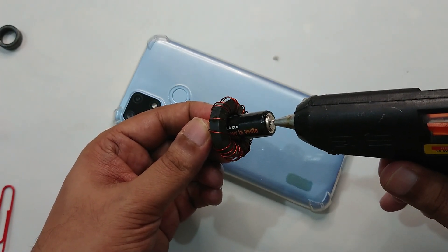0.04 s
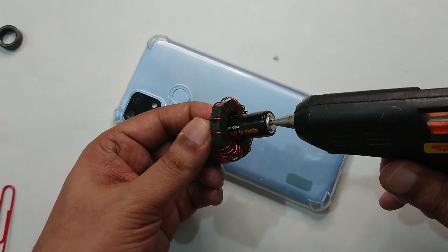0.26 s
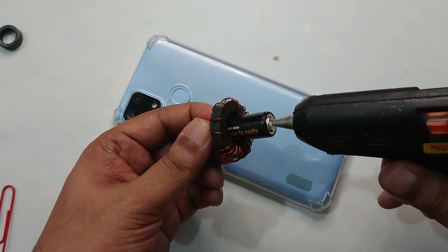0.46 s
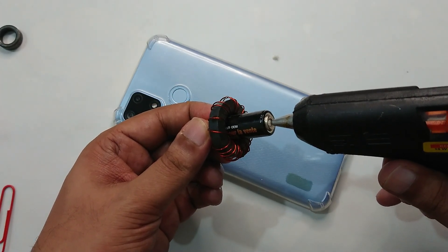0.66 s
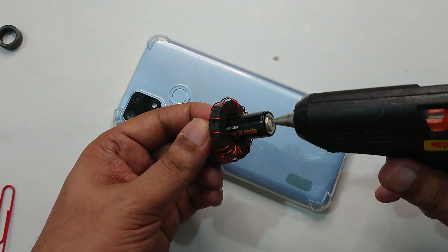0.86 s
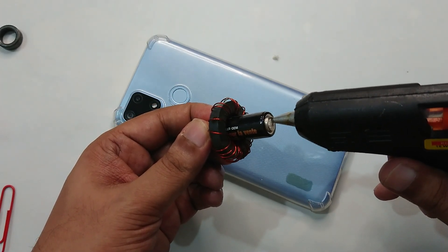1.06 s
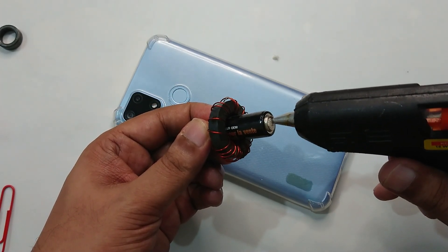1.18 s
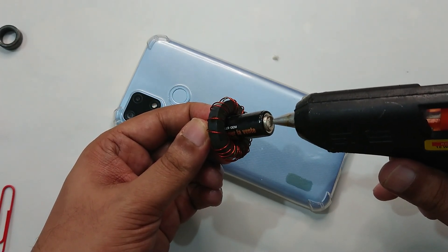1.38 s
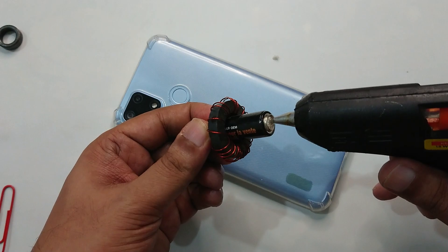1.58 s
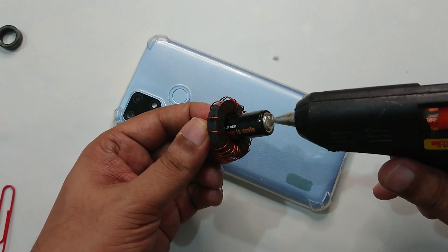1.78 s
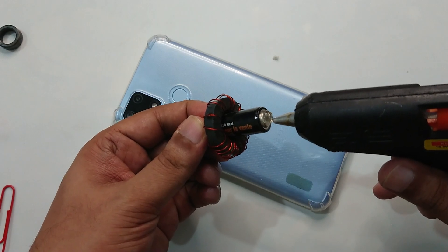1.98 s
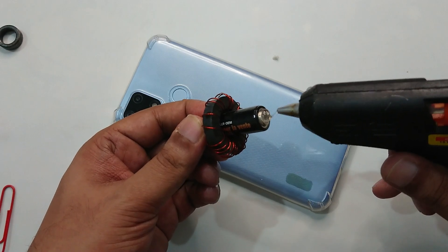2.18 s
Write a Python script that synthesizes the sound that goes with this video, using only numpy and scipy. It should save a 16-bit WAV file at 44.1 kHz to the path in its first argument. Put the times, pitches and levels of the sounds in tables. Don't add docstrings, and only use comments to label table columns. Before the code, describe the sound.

A hot glue gun's plastic trigger cracks once, very sharp and close, with a bright room tail; half a second later the released trigger knocks and ticks with a tiny spring ping, over faint rumble and hiss.

```python
import sys
import numpy as np
from scipy import signal
from scipy.fft import irfft
from scipy.io import wavfile
from scipy.ndimage import uniform_filter1d

SR = 44100
rng = np.random.default_rng(int(sys.argv[2]) if len(sys.argv) > 2 else 0)


def dump(signal):
    limited = np.clip(np.atleast_2d(signal).T, -1, 1)
    pcm = np.round(limited * 32767).astype(np.int16)
    wavfile.write(sys.argv[1], SR, pcm)


def attenuation_scalar(level_db):
    decades = np.asarray(level_db, float) / 20
    return 10 ** decades


N = 98651
SNAP_S = 1.64825

# f/Hz, level/dB, t60/s
PORT_RINGS = [
    [(6930, -12, .006), (9130, -10, 0.0072), (10620, -2.5, .004), (12820, 6, 0.0036), (13500, -16, 0.0088)],
    [(6860, -5, .005), (8650, 2.5, 0.0067), (10150, -1.5, .0035), (12400, -2.5, 0.0044),
     (13500, -11.5, 0.0085)],
]


def evened(x):
    return x / np.sqrt(np.mean(x ** 2) + 1e-30)


def read(points, hz):
    f, value = np.transpose(points)
    return np.interp(np.log(hz + 1), np.log(f + 1), value)


def spikes(times, sizes):
    hz = np.fft.rfftfreq(N, 1 / SR)
    return irfft(np.asarray(sizes) @ np.exp(-2j * np.pi * np.outer(times, hz)), N)


def modes(table, turn=-1):
    rise_s = 0.00008
    t = np.arange(4096) / SR
    ring = np.zeros(4096)
    for k, (hz, db, t60) in enumerate(table):
        ring += turn ** k * attenuation_scalar(db - 60 * t / t60) * np.sin(2 * np.pi * hz * t)
    return ring * (1 - np.exp(-t / rise_s))


def hum(hz, width_hz):
    r = np.exp(-np.pi * width_hz / SR)
    noise = rng.standard_normal(N) + 1j * rng.standard_normal(N)
    slow = signal.lfilter([1 - r], [1, -r], noise)
    carrier = np.exp(2j * np.pi * hz * np.arange(N) / SR)
    return evened((slow * carrier).real)


def wash(colour, patchy_db, level_db):
    # f/Hz, correlation
    likeness = [(60, 0.91), (130, 0.69), (290, 0.99), (640, 0.54), (1410, 0.24), (3100, -0.082),
                (6820, -0.04), (15000, 0.095)]
    # f/Hz, left over right/dB
    balance = [(60, -4), (110, -3.5), (200, -6.5), (380, -3), (700, -5.5), (1290, -5), (2380, -4.5),
               (4400, 4), (8120, -0.5), (15000, -3)]
    frames, hz = N // 256 + 5, np.fft.rfftfreq(1024, 1 / SR)
    a, b, c, d, patches = rng.standard_normal((frames, 513, 5)).T
    patches = uniform_filter1d(patches, size=10, axis=0)
    patches = evened(uniform_filter1d(patches, size=12, axis=1))
    same = np.clip(read(likeness, hz), -1, 1)[:, None]
    left = a + 1j * b
    right = same * left + np.sqrt(1 - same ** 2) * (c + 1j * d)
    colour_db = read(colour, hz) + np.outer([.5, -.5], read(balance, hz))
    z = np.array([left, right]) * attenuation_scalar(colour_db[..., None] + patchy_db * patches)
    x = signal.istft(z, nperseg=1024, noverlap=768)[1][:, :N]
    return attenuation_scalar(level_db) * x / np.std(x.mean(0))


def hiss():
    # f/Hz, level per Hz/dB
    hiss_colour = [(590, -28), (1350, -1.5), (1590, -10), (2990, -13.5), (4100, -13.5), (5740, -28),
                   (11500, -17.5), (15800, -19.5)]
    return wash(hiss_colour, 1.2, -78)


def rumble_swell():
    # t/s, level/dB
    swell = [(0.0, -57), (0.17, -68), (0.53, -66.5), (0.69, -65.5), (1.08, -66), (1.22, -71), (1.3, -69),
             (1.76, -65.5), (2.0, -68.5), (2.23, -70)]
    s, db = np.transpose(swell)
    return np.interp(np.arange(N) / SR, s, db - db.mean())


def rumble():
    # f/Hz, level per Hz/dB
    rumble_colour = [(26, -36.5), (45, -5.5), (96, -3), (175, -9), (300, -13), (474, -14.5), (717, -22.5),
                     (820, -14.5), (1100, -27.5), (1430, -61.5)]
    return wash(rumble_colour, 1.7, -64) * attenuation_scalar(0.16 * rumble_swell())


def fan_drone():
    # f/Hz, width/Hz, level/dB
    drone_tones = [(47.3, 1.3, -68), (89.3, 3.4, -72), (98.45, 2.8, -66.5), (137.4, 7.8, -76.5),
                   (194.3, 16, -78), (303.6, 5.2, -79.5), (770.5, 9.4, -81), (821, 14, -80),
                   (1319, 37, -88)]
    hums = np.array([attenuation_scalar(db) * hum(hz, width) for hz, width, db in drone_tones])
    swelling = hums[1:4].sum(0) * attenuation_scalar(rumble_swell())
    steady = hums[0] + hums[4:].sum(0)
    return (swelling + steady) * attenuation_scalar([[-2.2], [2.1]])


def far_squeal():
    # t/s, level/dB
    squeal_fade = [
        (1.96, -100),
        (2.0, -86.5),
        (2.1, -95),
        (2.14, -100),
    ]
    fade_db = np.interp(np.arange(N) / SR, *np.transpose(squeal_fade))
    return attenuation_scalar(fade_db) * hum(2170, 10)


def room(x):
    # f/Hz, level per Hz/dB
    tail_colour = [(200, -4), (883, -14), (2050, -18), (3500, -21), (5000, -12), (9930, -1), (14900, -6),
                   (15250, -40)]
    # f/Hz, left over right/dB
    tail_balance = [(60, -6.5), (110, -6.5), (200, -1.5), (380, 0), (700, -10), (1290, -2.5), (2380, 0.5),
                    (4400, 5), (8120, -4), (15000, 12)]
    # f/Hz, t60/s
    tail_decay = [(500, 0.28), (1320, 0.46), (3480, 0.43), (6000, .42), (9190, 0.39), (12000, .35),
                  (15000, 0.33)]
    dip_hz, dip_width_hz, dip_db = 5500, 200, -10.5
    first_wall_s, build_s, near_db, fade_in_s = 0.0064, 0.0017, -10.5, 0.0026

    slots = np.arange(60, SR - 6, 6)
    at = slots + rng.integers(0, 6, (2, len(slots)))
    sizes = rng.choice([-1., 1.], at.shape) * rng.uniform(.3, 1, at.shape)
    taps = np.zeros((2, SR))
    np.put_along_axis(taps, at, sizes, axis=1)

    hz, t, z = signal.stft(taps, SR, nperseg=256)
    colour = read(tail_colour, hz) + np.outer([.5, -.5], read(tail_balance, hz))
    colour = colour + dip_db * np.exp(-((hz - dip_hz) / dip_width_hz) ** 2)
    decay_db = 60 * t / read(tail_decay, hz)[:, None]
    tail = signal.istft(z * attenuation_scalar(colour[..., None] - decay_db), SR, nperseg=256)[1]

    t = np.arange(tail.shape[1]) / SR
    thin = np.clip(1 - (t - first_wall_s) / build_s, 0, 1)
    tail *= np.clip(t / fade_in_s, 0, 1) * attenuation_scalar(near_db * thin)
    return signal.fftconvolve(x[None], tail / np.linalg.norm(tail.mean(0)), axes=1)[:, :N]


def spring_ping():
    # t/s, level/dB, f/Hz, t60/s
    pings = [
        (2.2284, -45.5, 4400, .011),
        (2.2322, -55, 4500, .012),
    ]
    ratio, overtone_db, t60_share = 2.25, -7, 0.29
    out = 0
    for at, db, hz, t60 in pings:
        ring = modes([(hz, 0, t60), (ratio * hz, overtone_db, t60_share * t60)])
        out = out + signal.oaconvolve(spikes([at], [attenuation_scalar(db)]), ring)
    return out


def trigger_ticks():
    # t/s, level/dB, crack over knock/dB, left over right/dB
    tick_events = [(.752, -86, 12, -5), (1.381, -74, -16, 0), (1.434, -90, -15, 0), (1.6105, -77.5, 9.5, 0),
                   (2.187, -65, -18, -2), (2.1905, -71, -12, -2), (2.1948, -54.5, -11.5, -15),
                   (2.1964, -46.5, -17.5, -6.5), (2.1975, -57, -15, -3), (2.2015, -71, -6, 5),
                   (2.2055, -60, -15, 8), (2.2222, -58, -6, -6), (2.2285, -57, -5, -9),
                   (2.2262, -64, -15, 6), (2.2365, -57, -10, -7)]
    # f/Hz, level/dB, t60/s
    trigger_body = [(800, -9.5, 0.024), (1460, -9, 0.026), (2870, -3.5, 0.012), (4210, -5, 0.02),
                    (5200, -8, .007)]
    ping_pan_db, room_db = 10, -0.5
    s, db, bright_db, pan_db = np.transpose(tick_events)
    ping = spring_ping()
    out = []
    for side, ring in zip((.5, -.5), PORT_RINGS):
        port_db = db + side * pan_db
        knock = signal.oaconvolve(spikes(s, attenuation_scalar(port_db)), modes(trigger_body))
        crack = signal.oaconvolve(spikes(s, attenuation_scalar(port_db + bright_db)), modes(ring))
        out.append((knock + crack + attenuation_scalar(side * ping_pan_db) * ping)[:N])
    return np.array(out) + attenuation_scalar(room_db) * room(np.mean(out, axis=0))


def air_push():
    # delay/ms, sign, level/dB, width/ms
    push_bounces = [(-0.03, 1, 3, 0.08), (1.17, 1, -9, 0.07), (1.68, -1, -4, 0.14), (2.25, 1, -12, 0.2),
                    (2.9, 1, -15, .4), (3.45, 1, -13, 0.08)]
    t_ms = (np.arange(N) / SR - SNAP_S) * 1000
    bumps = np.zeros(N)
    for at, sign, db, width in push_bounces:
        bumps += sign * attenuation_scalar(db) * np.exp(-.5 * ((t_ms - at) / width) ** 2)
    return signal.lfilter(*signal.butter(2, 81, "high", fs=SR), bumps)


def snap():
    # delay/ms, sign, left level/dB, right level/dB
    snap_paths = [(0, 1, 5.5, 5.5), (.39, 1, -4, -8), (1.13, 1, -2.5, -7), (1.8, 1, -1.5, -1),
                  (2.79, 1, -7, -10), (3.45, 1, -11, -9)]
    # delay/s, level/dB
    wall_echoes = [(.009, -42), (0.012, -44.5), (0.0147, -35), (.0165, -32)]
    snap_db, tail_db = -15.5, -6
    ms, sign, *port_levels = np.transpose(snap_paths)
    delay, wall_db = np.transpose(wall_echoes)
    walls = spikes(SNAP_S + delay, attenuation_scalar(wall_db))
    push = air_push()
    out = []
    for db, ring, push_db in zip(port_levels, PORT_RINGS, (-26.5, -23)):
        hits = spikes(SNAP_S + ms / 1000, sign * attenuation_scalar(db + snap_db)) + walls
        crack = signal.oaconvolve(hits, modes(ring, turn=0.9))[:N]
        out.append(attenuation_scalar(push_db) * push + crack)
    return np.array(out) + room(spikes([SNAP_S], [attenuation_scalar(tail_db)]))


def scene():
    background = hiss() + rumble() + fan_drone() + far_squeal()
    return background + trigger_ticks() + snap()


def low_pass(x):
    return signal.sosfilt(signal.butter(12, 16670, fs=SR, output="sos"), x)


def record(dry):
    low_cut = signal.butter(4, 43.4, "high", fs=SR, output="sos")
    top_cut = signal.firwin(301, 15950, window=("kaiser", 8), fs=SR)[None]
    mix = signal.oaconvolve(signal.sosfilt(low_cut, dry), top_cut, "same")
    return low_pass(mix)


dry = scene()
out = record(dry)
dump(out)
```